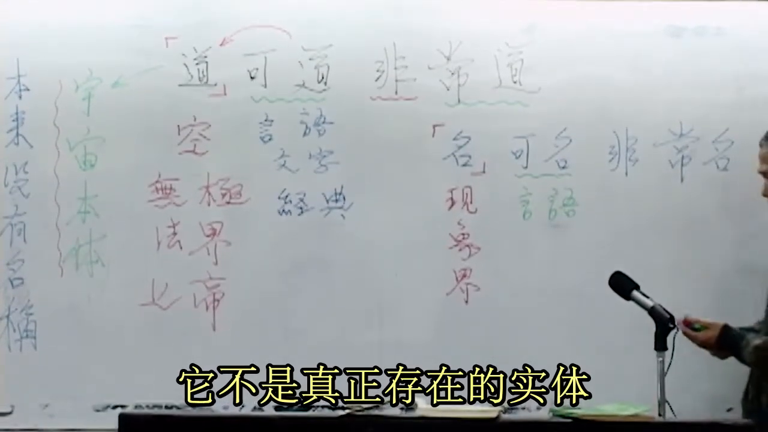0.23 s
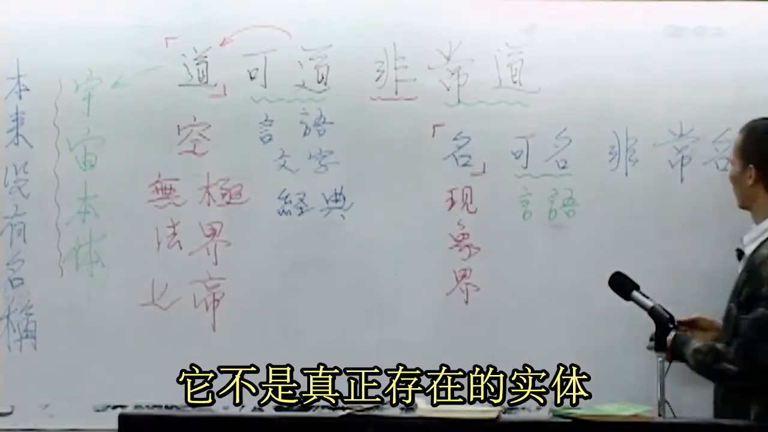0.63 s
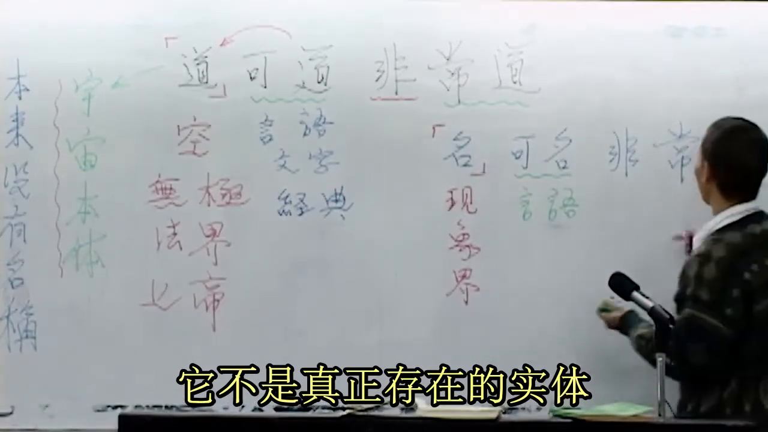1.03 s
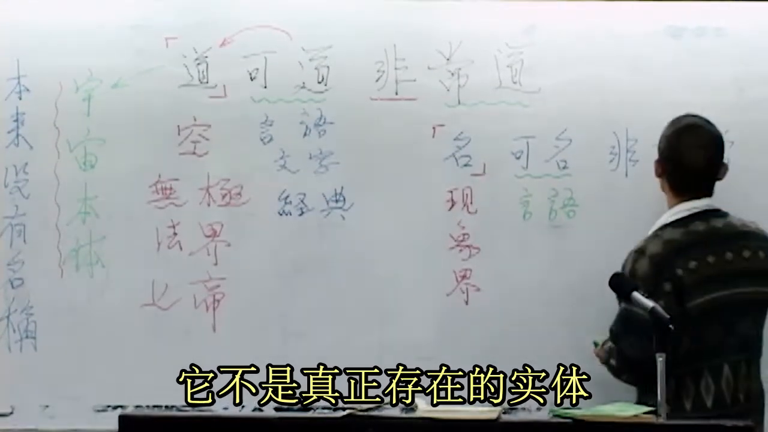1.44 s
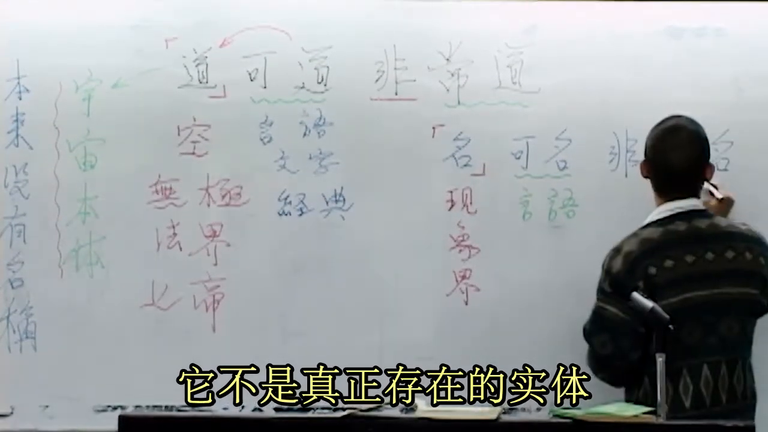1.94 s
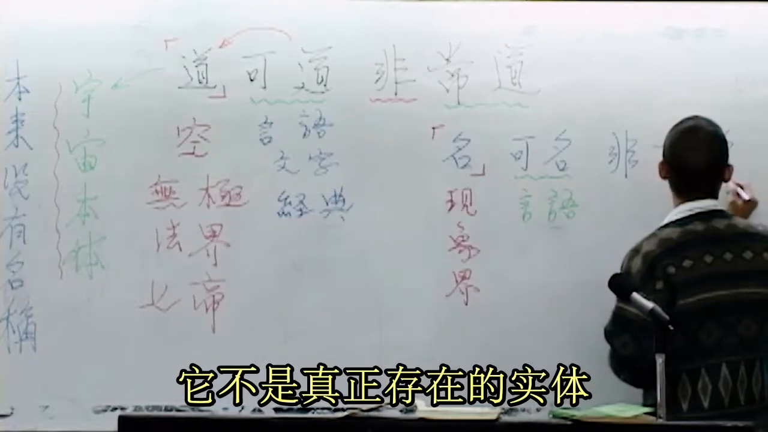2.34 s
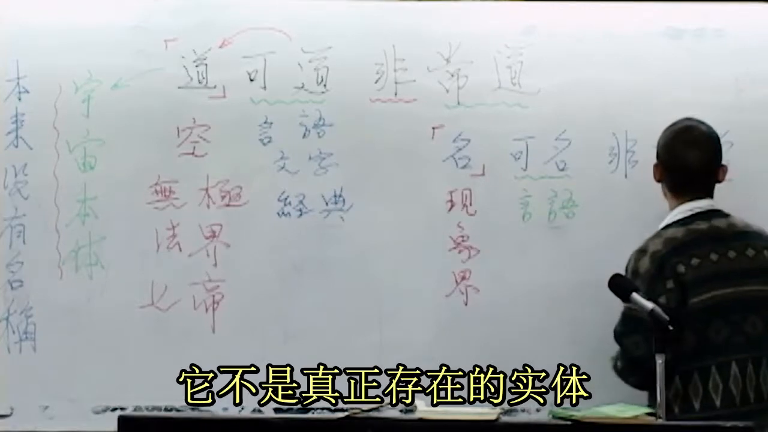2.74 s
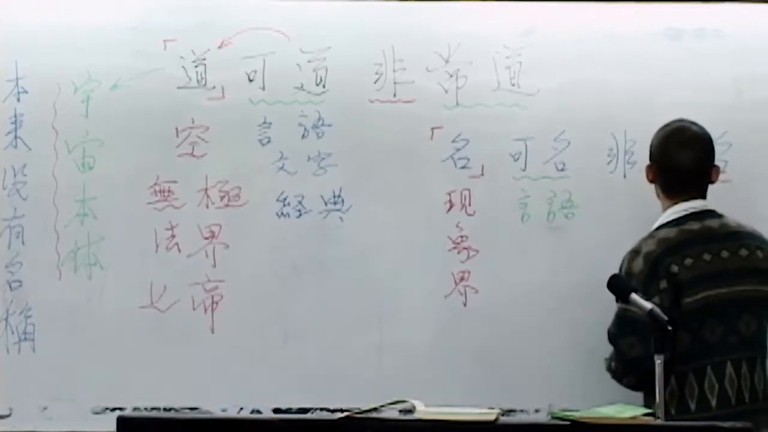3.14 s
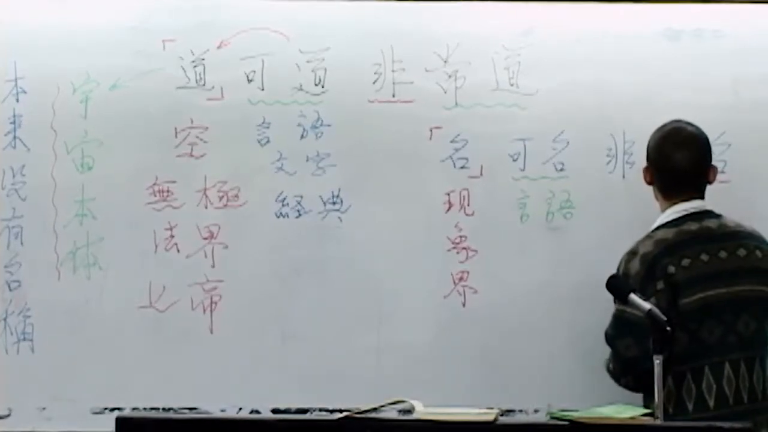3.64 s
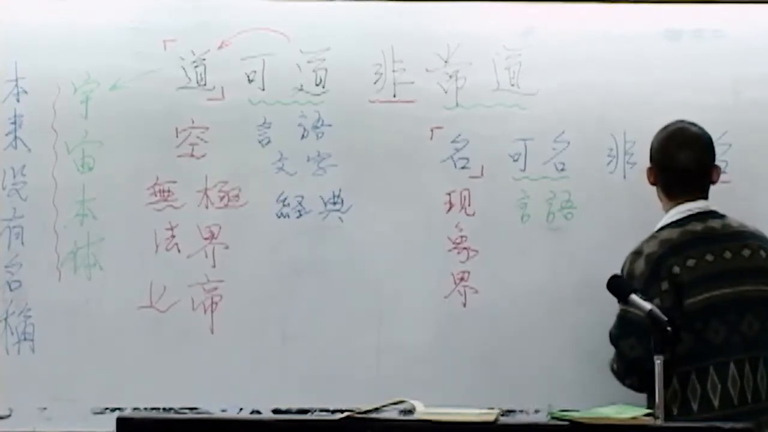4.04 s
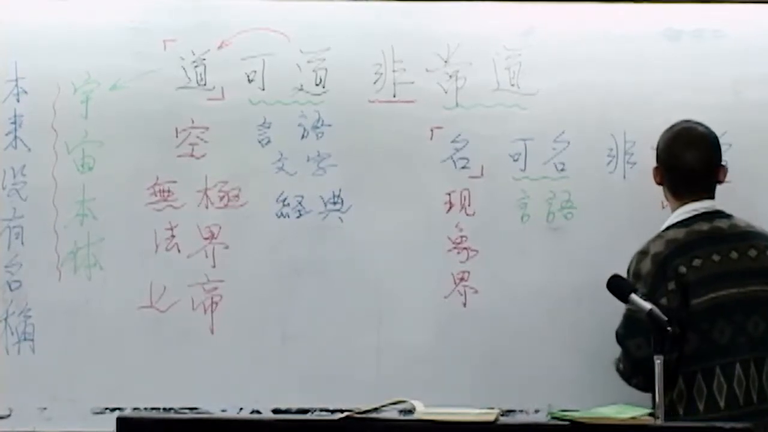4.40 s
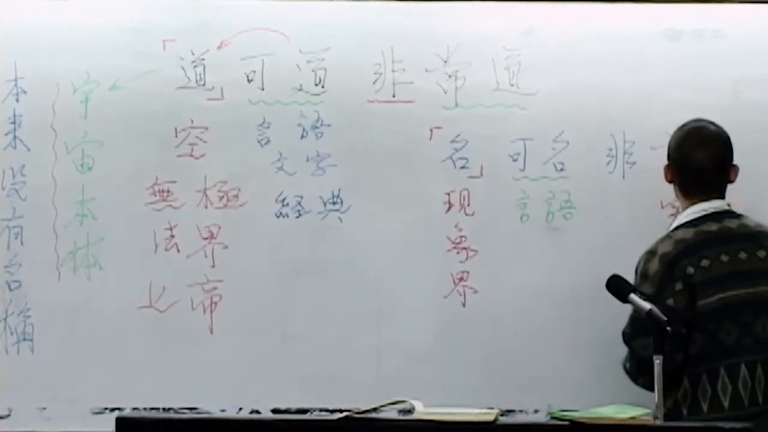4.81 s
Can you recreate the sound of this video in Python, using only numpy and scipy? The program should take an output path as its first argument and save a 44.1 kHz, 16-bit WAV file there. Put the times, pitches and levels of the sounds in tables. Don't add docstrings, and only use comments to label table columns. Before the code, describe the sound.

In a quiet classroom, a marker cap clicks in the hand close to the microphone, then snaps sharply. A wooden object knocks lightly onto the tray. Faint felt strokes follow, with low thuds on the whiteboard, a crisp nib tap and a short high squeak. Noise reduction leaves near silence between sounds.

```python
import sys
import numpy as np
from scipy import signal
from scipy.fft import rfft, irfft, next_fast_len
from scipy.io import wavfile
from scipy.ndimage import uniform_filter1d, minimum_filter1d, map_coordinates

SR = 44100
rng = np.random.default_rng(int(sys.argv[2]) if len(sys.argv) > 2 else 0)


def boost_factor(decibels):
    exponent = np.asarray(decibels, float) / 20
    return 10 ** exponent


def log_audio(samples):
    frames = np.atleast_2d(samples).T
    limited = np.clip(frames, -1, 1)
    pcm = np.round(limited * 32767).astype(np.int16)
    wavfile.write(sys.argv[1], SR, pcm)


N = 223317

# [t/s, length/s, level/dB, f/Hz]
RUMBLE_LUMPS = [(0.046, 0.041, -70, 50.06), (0.241, 0.028, -54.5, 54.57), (0.307, 0.063, -69, 55.08),
                (0.452, 0.025, -56.5, 49.76), (.55, 0.027, -58, 54.56), (0.717, 0.096, -53.5, 49.52),
                (0.898, 0.081, -59, 55.26), (1.086, 0.032, -48.5, 49.98), (1.391, 0.14, -54.5, 53.29),
                (1.618, 0.072, -52.5, 59.84), (1.699, 0.098, -52.5, 45.3), (1.859, 0.034, -57, 85.13),
                (2.149, 0.03, -47.5, 49.86), (2.237, 0.012, -50.5, 55.34), (2.405, 0.066, -54.5, 49.97),
                (2.547, 0.0297, -53, 49.78), (2.619, 0.052, -61.5, 55.17), (2.81, 0.065, -40.5, 42.12),
                (2.93, .04, -48, 39.4), (3.06, .07, -55, 46.07), (3.169, 0.027, -63.5, 45.18),
                (3.32, 0.075, -68.5, 50.53), (3.535, 0.033, -44.5, 68.15), (3.656, 0.041, -48.5, 39.98),
                (3.745, 0.041, -53.5, 34.3), (3.925, .08, -60, 55.34), (4.167, 0.07, -56.5, 66.12),
                (4.533, 0.039, -58, 44.53), (4.736, 0.15, -56, 66.08), (4.905, 0.37, -46.5, 50.34)]
# [f/Hz, level/dB]
RUMBLE_SPECTRUM = [(12, -45.5), (20, -30), (40, -3.5), (62, 5), (136, -32), (157, -60), (200, -40),
                   (260, -52.5), (440, -120)]
# [t/s, length/s, level/dB]
LAMP_SPELLS = [(0, 0.9, -82), (1.0, 0.7, -88), (1.85, 0.052, -87), (1.98, 0.22, -90), (2.26, 0.16, -92.5),
               (2.54, 0.24, -88.5), (2.88, 0.0798, -92.5), (3.53, 0.04, -85.5), (3.84, .06, -93.5),
               (4.11, .05, -95), (4.46, 0.047, -90), (4.79, 0.084, -100), (4.92, .08, -95)]
# [f/Hz, level/dB per bin]
ROOM_AIR = [(30, -91), (120, -77.5), (300, -77), (400, -69.5), (1200, -76), (2400, -83.5), (3000, -86),
            (4000, -86), (4500, -91.5), (7000, -92.5), (8800, -100.5), (9300, -92.5), (10200, -93.5),
            (14000, -99)]

# [t/s, peak level/dB, main ring f/Hz, upper ring rel level/dB, crack rel level/dB]
CAP_RATTLES = [
    (0.0064, -23, 5440, -17.5, -22.5),
    (0.0226, -46, 6020, -16.5, -18),
    (0.0563, -69.5, 5600, -7.5, -20),
    (0.0814, -29, 5360, -15, -41),
    (0.1148, -43.5, 5510, -12.5, -36),
    (0.1195, -29.5, 5590, -10.5, -27),
    (0.3191, -23, 5425, -28, -56.5),
    (0.3337, -44, 5720, -16.5, -38),
    (0.3607, -36.5, 5430, -49, -57),
    (0.3773, -51.5, 5360, -27, -47),
]
# [f/Hz, level/dB, t60/s]
CAP_BODY = [(2755, -27.5, 0.02), (3534, -31.5, .03), (4264, -31.5, 0.018)]
# [f/Hz, level/dB, t60/s]
CAP_UPPER = [(6920, 14, 0.009), (7494, -2, 0.024)]
# [f/Hz, level/dB, t60/s]
CAP_CRACK = [(9800, 7, 0.0024), (10400, 4, .004), (11700, -6, 0.00049), (11220, -11, 0.0017),
             (12890, 0, .004), (13300, -4, 0.0016)]

# [t/s, level/dB, f/Hz]
SMALL_TICKS = [
    (0.094, -57.5, 1130),
    (1.98, -74, 11000),
    (3.7, -74, 11350),
    (4.746, -54, 1280),
    (3.532, -50.5, 655),
    (3.532, -48, 500),
    (0.47, -67, 9800),
    (1.3, -61, 1830),
]

# [t/s, peak level/dB, low ring rel level/dB]
CAP_SNAPS = [
    (0.9902, -18, -32.5),
    (0.995, -21.5, -35),
    (1.006, -32.5, -8),
]
# [f/Hz, level/dB, t60/s]
BARREL_MODES = [(836, -36, 0.059), (1729, -25.5, 0.032), (2084, -24.5, 0.03), (3347, -3, 0.0072),
                (3577, -1, 0.0069), (4137, -8, 0.0018), (4680, -2.5, 0.0039), (4800, -1.5, 0.0059),
                (6370, -13, 0.0068), (7665, 0.5, 0.00395), (8100, -7.5, 0.0051), (10354, -10.5, 0.0059),
                (13500, -38.5, 0.011)]

# [t/s, peak level/dB, 80, 160 and 240 Hz panel mode rel level/dB]
BOARD_THUDS = [
    (1.163, -29.5, -3.5, -7, -34),
    (2.792, -25, -19.5, -12, -5.5),
    (3.005, -27, -13.5, -16.5, -3),
    (3.528, -31, -16.5, -16, -3.5),
    (4.065, -37.5, -6.5, -15.5, -11.5),
    (4.342, -39.5, -9, -15.5, -7),
    (4.911, -37, -11, -31, -14),
]
# [f/Hz, t60/s]
PANEL_MODES = [(85, 0.18), (160, 0.13), (242, 0.083)]
# [t/s, peak level/dB]
WOOD_KNOCKS = [
    (1.747, -35.5),
    (1.763, -40),
    (1.783, -42.5),
]
# [f/Hz, level/dB, t60/s]
TRAY_MODES = [(100, -5.5, 0.3), (151, 1, 0.1), (235.4, -0.5, 0.21), (373, -6, 0.41), (431, -19, 0.29),
              (605, -17, 0.52), (641, -14.5, 0.27), (808, -10, 0.071), (941, -12.5, 0.12),
              (985.5, -11.5, 0.42), (1445, -13.5, 0.06), (1860, -24, 0.26), (3062, -26.5, .05)]

# [t/s, length/s, low, middle and high resonance level/dB]
NIB_STROKES = [(1.93, 0.028, -115, -84, -77.5), (1.97, .06, -82, -85, -68.5),
               (2.05, 0.11, -110, -95, -71.5), (2.13, 0.089, -71, -98.5, -64.5),
               (2.26, .05, -71.5, -82, -64), (2.32, 0.0096, -61, -76.5, -60.5),
               (2.85, 0.055, -100, -81, -110), (3.015, .025, -73, -76, -100),
               (3.04, 0.052, -94.5, -74, -80.5), (3.185, 0.07, -76.5, -67.5, -75.5),
               (3.25, 0.064, -85.5, -73.5, -73.5), (3.33, 0.037, -65.5, -70.5, -75.5),
               (3.55, 0.013, -56.5, -63.5, -68.5), (3.6, 0.04, -59.5, -68, -78.5),
               (3.68, .05, -75.5, -63, -78.5), (3.745, .03, -68, -73, -86.5),
               (3.79, 0.024, -61, -62.5, -73.5), (3.85, 0.074, -65.5, -62.5, -72.5),
               (4.13, .05, -69, -58.5, -70.5), (4.18, 0.042, -52, -64, -63), (4.37, .11, -80, -78, -75),
               (4.575, 0.025, -75.5, -78.5, -82), (4.95, 0.066, -76, -69, -73),
               (4.99, 0.025, -60, -75.5, -77)]
# [t/s, low, middle and high f/Hz]
PEN_LEAN = [(1.9, 4430, 5400, 6436), (2.4, 4740, 5200, 6690), (3.0, 4600, 5400, 5930),
            (3.16, 4600, 5200, 6050), (3.3, 4810, 5800, 6500), (3.35, 4750, 5300, 5980),
            (3.55, 4838, 5400, 6734), (4.11, 4934, 5400, 6940), (4.22, 4590, 5150, 7020),
            (4.38, 4550, 5400, 6223), (4.55, 4580, 5350, 6790), (5.06, 4800, 5300, 6620)]
# [centre t/s, peak level/dB, f/Hz, length/s]
NIB_SQUEAKS = [
    (2.328, -56.5, 4750, 0.011),
    (3.35, -51.5, 4760, 0.021),
    (4.174, -47.5, 4740, 0.0092),
    (4.192, -43, 4583, .011),
    (4.2, -46.5, 4680, 0.0047),
    (4.216, -33, 4579, 0.022),
]
# [t/s, peak level/dB, f/Hz, side ring rel level/dB]
NIB_TAPS = [
    (3.54, -32, 4670, -36.5),
    (3.5418, -33, 5140, -28),
    (3.5404, -31, 5445, -20),
    (3.651, -45.5, 5370, -27),
]

# [f/Hz, t60/s]
ROOM_DECAY = [(100, .7), (1000, 0.13), (5000, 0.79), (9000, 0.39), (14000, 0.13)]
# [f/Hz, fall/dB per s]
METER_FALL = [(100, 352), (380, 265), (600, 102), (1000, 96), (2200, 139.5), (3200, 86), (6000, 93.5),
              (12000, 105.5)]
# [f/Hz, level/dB]
LEFTOVER_HISS = [(88, -32), (150, -4), (220, -10.5), (454, -14), (2130, -28.5), (4750, -30), (5030, -29.5),
                 (14400, -37.5)]

FRAME = 2048
LAND_DB_PER_S, LIFT_DB_PER_S = 1101, 503.5
SWELL_DB_PER_S, EBB_DB_PER_S = 451, 300.5
LUMP_S, SHAKE_DB = 0.03, -19.5


def unit(x):
    return x / np.sqrt(np.mean(np.abs(x) ** 2) + 1e-20)


def along(points, hz):
    f, v = np.transpose(points)
    return np.interp(np.log(hz + 1), np.log(f + 1), v)


def curves(rows):
    s, *columns = np.transpose(rows)
    return [np.interp(np.arange(N) / SR, s, column) for column in columns]


def wobble(rate):
    knots = rng.standard_normal(int(N * rate / SR) + 4)
    return map_coordinates(knots, [np.arange(N) * rate / SR])


def coloured(points):
    m = next_fast_len(N + 8192)
    spectrum = rfft(rng.standard_normal(m)) * boost_factor(along(points, np.fft.rfftfreq(m, 1 / SR)))
    return unit(irfft(spectrum, m)[:N])


def resonance(hz, width_hz):
    slow = rng.standard_normal(N) + 1j * rng.standard_normal(N)
    lowpass = signal.butter(4, np.clip(width_hz / 2, 5, 5000), fs=SR, output="sos")
    slow = signal.sosfilt(lowpass, slow)
    return unit(np.real(slow * np.exp(2j * np.pi * np.cumsum(hz) / SR)))


def steady(hz):
    return np.full(N, float(hz))


def spells(rows, rise_db, fall_db):
    t = np.arange(0, N, 32) / SR
    s, length, *levels = np.transpose(rows)[..., None]
    early_db = rise_db * np.clip(s - t, 0, None)
    late_db = fall_db * np.clip(t - s - length, 0, None)
    tops = [np.max(db - (early_db + late_db), axis=0) for db in levels]
    return [boost_factor(np.interp(np.arange(N) / SR, t, top)) for top in tops]


def add(x, s, modes, attack):
    start = round(s * SR)
    for hz, db, t60 in modes:
        t = np.arange(min(int(2 * (t60 + attack) * SR), N - start)) / SR
        contact = 1 - np.exp(-(t / attack) ** 2)
        x[start:][:len(t)] += boost_factor(db - 60 * t / t60) * contact * np.sin(2 * np.pi * hz * t)


def building_rumble():
    lumps = [row[:3] for row in RUMBLE_LUMPS]
    lumps += [(s, LUMP_S, db + SHAKE_DB) for s, db, *_ in BOARD_THUDS]
    heave = resonance(curves(RUMBLE_LUMPS)[-1], width_hz=27)
    body = unit(boost_factor(3.7 * wobble(3.3)) * (2.1 * coloured(RUMBLE_SPECTRUM) + heave))
    return spells(lumps, SWELL_DB_PER_S, EBB_DB_PER_S)[0] * body


def lamp_whine():
    drift_hz = 8630 + 75 * wobble(16)
    flutter = boost_factor(2.0 + 2.5 * wobble(25))
    return spells(LAMP_SPELLS, 918, 740)[0] * flutter * resonance(drift_hz, width_hz=150)


def room_air():
    return boost_factor(-62) * coloured(ROOM_AIR)


def cap_rattle():
    x = np.zeros(N)
    for s, db, hz, upper_db, crack_db in CAP_RATTLES:
        add(x, s, [(hz, db + 12, .007), (hz * 1.07, db + 3.5, .006)], .001)
        add(x, s, [(f, db + g + rng.normal(0, 3.4) + 4.5, d) for f, g, d in CAP_BODY], .001)
        add(x, s, [(f, db + upper_db + g - 3.5, d) for f, g, d in CAP_UPPER], .0008)
        add(x, s, [(f, db + crack_db + g + 5.5, d) for f, g, d in CAP_CRACK], .0003)
    return x


def small_ticks():
    x = np.zeros(N)
    for s, db, hz in SMALL_TICKS:
        add(x, s, [(hz, db, .08)], .005)
    return x


def cap_snap():
    x, t = np.zeros(N), np.arange(SR // 50) / SR
    hiss = resonance(steady(4200), width_hz=2220)
    for s, db, low_db in CAP_SNAPS:
        add(x, s, [(f, db + g + rng.normal(0, 1.786) - 1.5, d) for f, g, d in BARREL_MODES], .0006)
        add(x, s, [(2950, db + low_db + 1.5, 0.042)], .0004)
        start = round(s * SR)
        x[start:][:len(t)] += boost_factor(db - 13.5 - 60 * t / 0.006) * hiss[start:][:len(t)]
    return x


def board_thuds():
    x = np.zeros(N)
    for s, db, *shares_db in BOARD_THUDS:
        shares = list(zip(PANEL_MODES, shares_db))
        add(x, s, [(hz, db + g + 7.5, d) for (hz, d), g in shares], .009)
        add(x, s, [(hz * rng.uniform(0.83, 0.93), db + g - 2.5, d * 1.4) for (hz, d), g in shares], .011)
    return x


def tray_knock():
    x = np.zeros(N)
    for s, db in WOOD_KNOCKS:
        add(x, s, [(f, db + g - 5.5 + rng.normal(0, 2.43), d) for f, g, d in TRAY_MODES], .003)
    return x


def nib_strokes():
    low, mid, high = spells(NIB_STROKES, LAND_DB_PER_S, LIFT_DB_PER_S)
    low_hz, mid_hz, high_hz = curves(PEN_LEAN)
    slips = unit(boost_factor(2.8 * wobble(45) + 1.5 * wobble(250)))
    bright = resonance(high_hz, width_hz=1060)
    bright += 0.16 * resonance(steady(7700), width_hz=880)
    bright += 0.39 * resonance(steady(6900), width_hz=300)
    low = low * resonance(low_hz, width_hz=340)
    mid = mid * resonance(mid_hz, width_hz=510)
    return slips * (low + mid + high * bright)


def nib_squeaks():
    x, t = np.zeros(N), np.arange(N) / SR
    for s, db, hz, length in NIB_SQUEAKS:
        swell = np.cos(np.pi * np.clip((t - s) / length, -.5, .5)) ** 0.98
        x += boost_factor(db) * swell * np.sin(2 * np.pi * hz * (t - s) * (1 - 1.1 * (t - s)))
    return x


def nib_taps():
    x = np.zeros(N)
    for s, db, hz, side_db in NIB_TAPS:
        below = [(2930, db + side_db + 10, .025), (2780, db + side_db + 5, .025)]
        above = [(6900, db - 19.0, .02), (8000, db - 19.0, .02)]
        add(x, s, [(hz, db + 11.5, .013)] + below + above, .0015)
    return x


def room(x):
    out, step = np.zeros(N + 2 * SR), SR // 4
    for start in range(0, N, step):
        hz, t, z = signal.stft(rng.standard_normal(SR), SR, nperseg=256)
        decay = boost_factor(-60 * t / along(ROOM_DECAY, hz)[:, None])
        tail = signal.istft(z * decay, SR, nperseg=256)[1][:SR]
        wet = signal.fftconvolve(x[start:start + step], tail / np.linalg.norm(tail))
        out[start + 150:][:len(wet)] += wet
    return out[:N]


def scene():
    background = building_rumble() + lamp_whine() + room_air()
    rattle, snap = cap_rattle(), cap_snap()
    board = small_ticks() + board_thuds() + tray_knock()
    pen = nib_strokes() + nib_squeaks() + nib_taps()
    wet = room(boost_factor(-20) * rattle + boost_factor(-21.0) * snap + boost_factor(-24.5) * pen + boost_factor(-11) * board)
    return (rattle + snap + pen + board + wet + background)[None]


def top_cut(x):
    return signal.sosfilt(signal.butter(12, 14530, fs=SR, output="sos"), x)


def record(dry):
    hz, t, z = signal.stft(dry, SR, nperseg=FRAME, noverlap=FRAME * 7 // 8)
    power = uniform_filter1d(np.abs(z) ** 2, size=3, axis=1)
    power = uniform_filter1d(power, size=3, axis=2)
    power = -minimum_filter1d(-power, size=3, axis=2)
    sinking = along(METER_FALL, hz)[:, None] * t
    meter_db = np.maximum.accumulate(10 * np.log10(np.abs(power) + 1e-30) + sinking, axis=2) - sinking
    ragged = unit(uniform_filter1d(rng.standard_normal(len(hz)), size=5))
    ragged_db = 3.0 * np.abs(ragged) * (hz > 2000)
    caution_db = 5 * (hz > 330) * (hz < 2600) + 1.5 * (hz > 9400) + 1.5 * (hz > 2600) * (hz < 3400)
    threshold_db = caution_db + along(ROOM_AIR, hz) + ragged_db - 1.5
    over_db = meter_db - threshold_db[:, None]
    gain = uniform_filter1d(.5 + .5 * np.tanh(over_db / 1.4), size=3, axis=1)
    clean = signal.istft(z * gain, SR, nperseg=FRAME, noverlap=FRAME * 7 // 8)[1][:, :N]
    return top_cut(clean + boost_factor(-92) * coloured(LEFTOVER_HISS))


dry = scene()
out = record(dry)
log_audio(out)
```